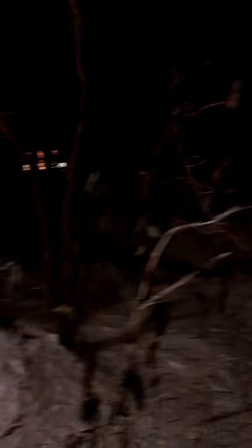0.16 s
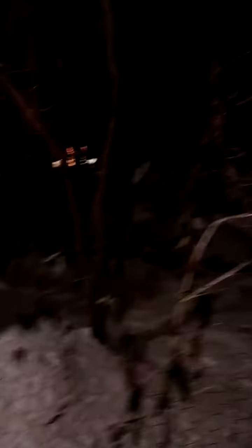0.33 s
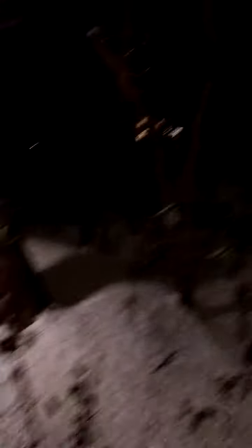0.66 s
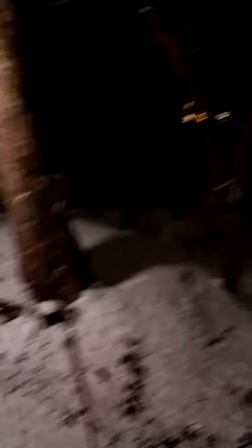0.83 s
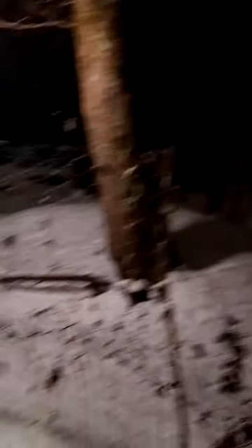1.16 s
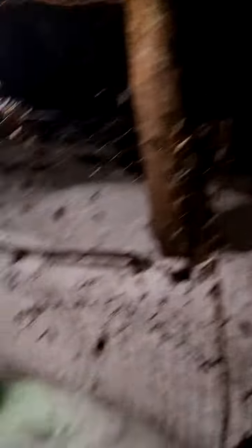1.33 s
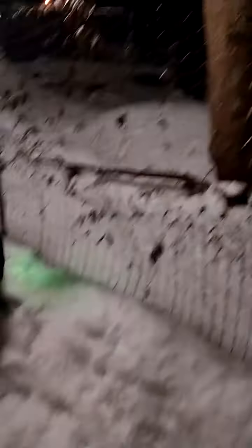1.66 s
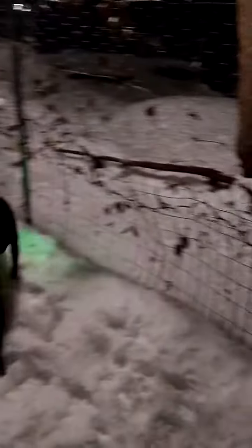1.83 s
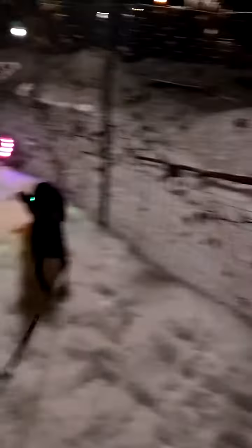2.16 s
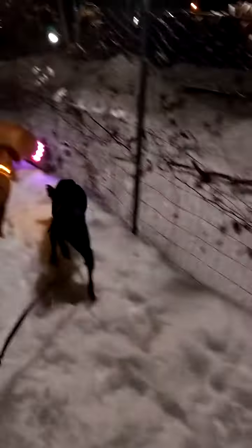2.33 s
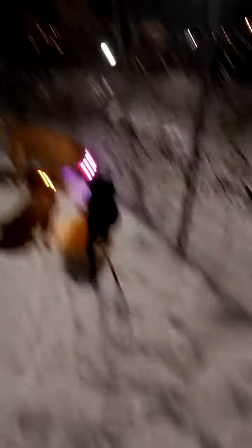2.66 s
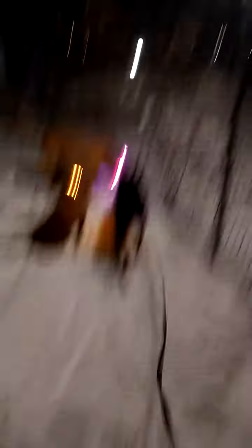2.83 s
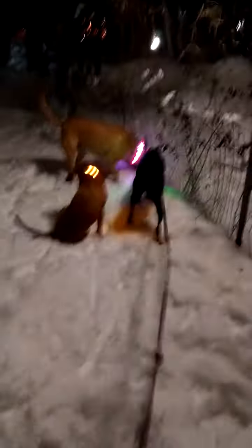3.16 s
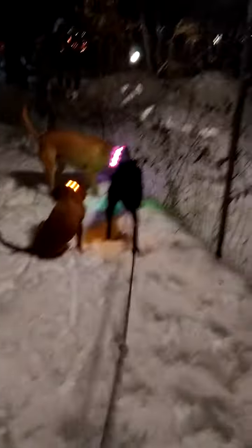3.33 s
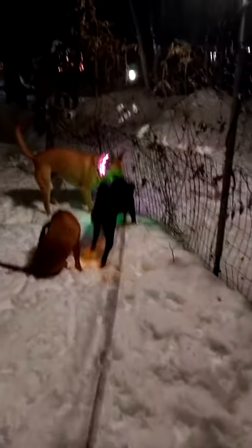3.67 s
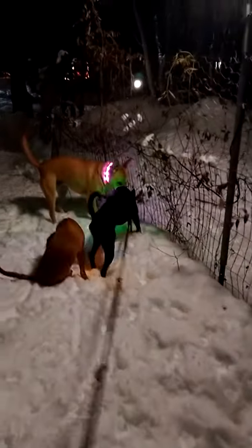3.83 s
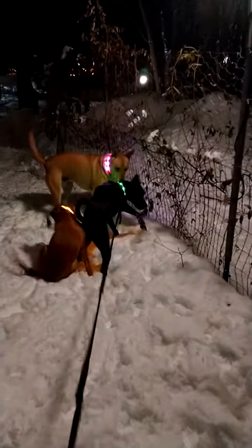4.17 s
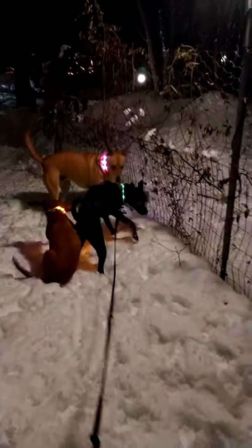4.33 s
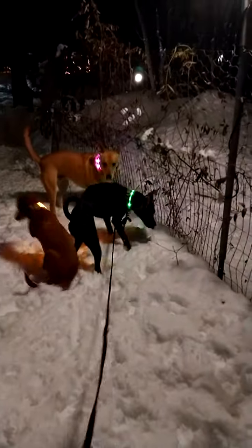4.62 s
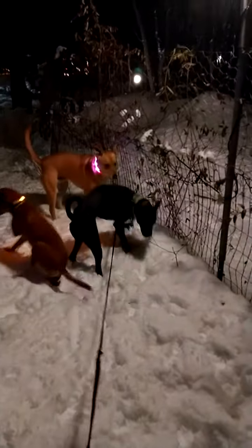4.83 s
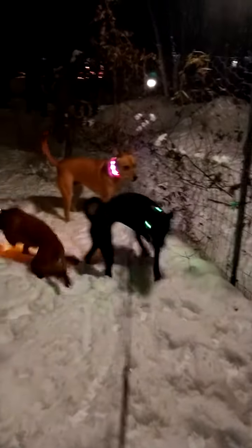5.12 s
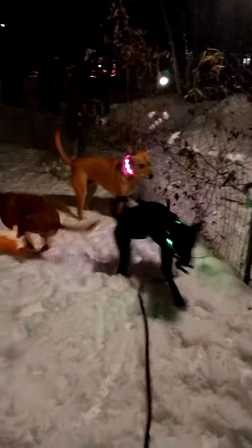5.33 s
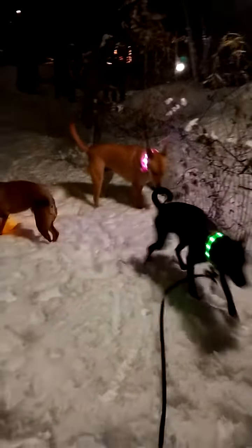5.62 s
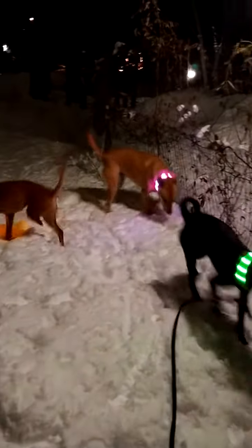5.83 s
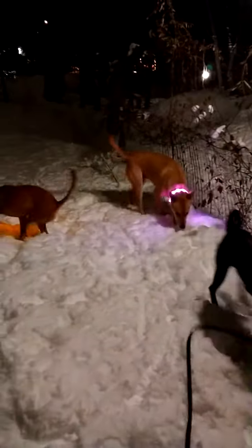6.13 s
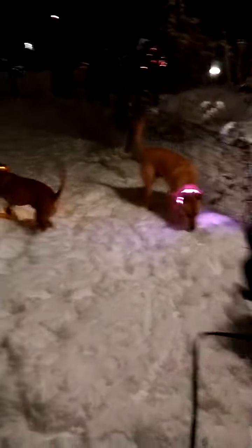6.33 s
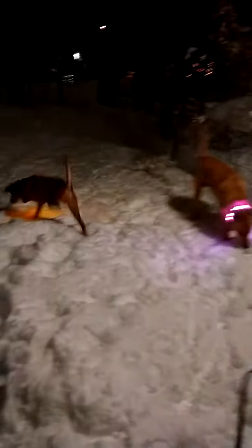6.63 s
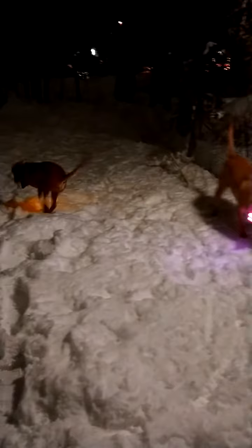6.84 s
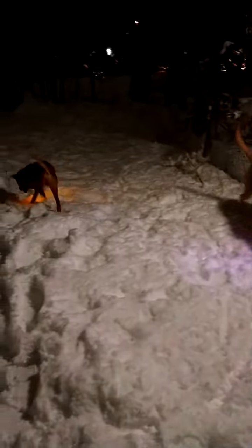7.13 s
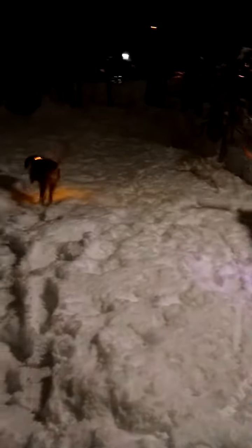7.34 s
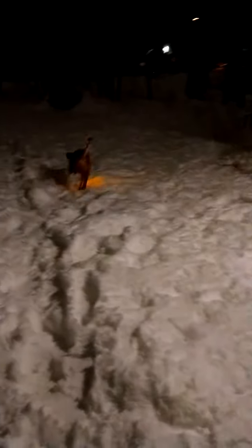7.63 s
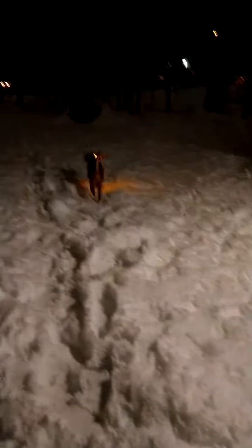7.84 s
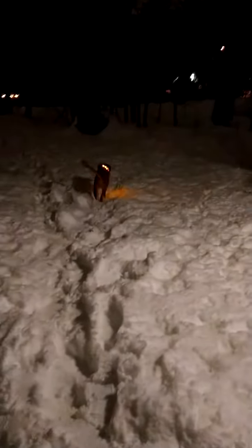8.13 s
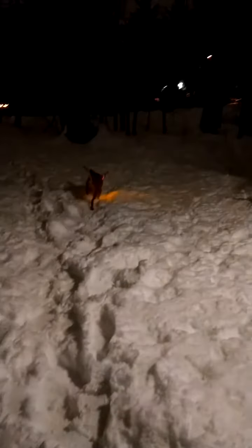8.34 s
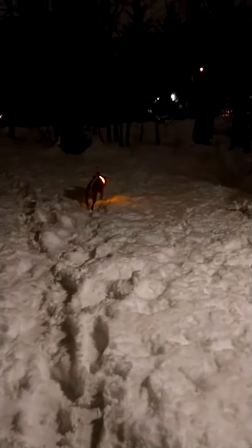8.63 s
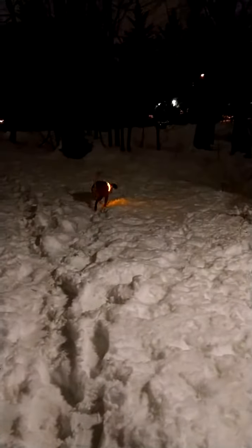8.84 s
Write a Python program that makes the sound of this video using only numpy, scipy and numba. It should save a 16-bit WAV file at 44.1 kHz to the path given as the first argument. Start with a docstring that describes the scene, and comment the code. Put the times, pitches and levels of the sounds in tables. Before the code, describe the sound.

Dog collar tags jingle in short bright bursts over close cloth and lead rustle, a brief snow crunch, and a faint low outdoor hum.

```python
"""Snowy yard at night: dogs mill about beside a walker who holds a phone and a lead.
A low town hum (shaped noise, two narrow notes) lies under all. Cloth and lead rustle close to the
right microphone (stick-slip grains). Metal collar tags clink (struck, damped modes), a nose whistles
(wavering sines), fibres or ice snap (noise bursts) and a boot crunches through the crust (coarse
grains, grit, decaying knocks)."""
import sys
import numpy as np
from scipy import signal
from scipy.fft import rfft, irfft, next_fast_len
from scipy.io import wavfile
from scipy.ndimage import uniform_filter1d
from numba import njit

SR = 44100
rng = np.random.default_rng(int(sys.argv[2]) if len(sys.argv) > 2 else 0)


def to_wav(s):
    """Save 16-bit WAV."""
    ch = np.atleast_2d(s).T  # columns
    pcm = np.round(np.clip(ch, -1, 1) * 32767)  # PCM
    wavfile.write(sys.argv[1], SR, pcm.astype(np.int16))


N = 396452

# town spectrum: (frequency [Hz], relative density [dB per Hz])
TOWN_SPECTRUM = [(20, -13), (60, -8), (170, 0.5), (293, -1), (388, -6.5), (923, -12), (2460, -28.5),
                 (5230, -44.5), (12400, -27), (15500, -31)]
# town level: (time [s], level [dB])
TOWN_LEVEL = [(0, -67.2), (3, -67.5), (4, -68.6), (9, -69.5)]
# town left-right likeness: (frequency [Hz], correlation [-1 to 1])
TOWN_LIKENESS = [(60, 0.89), (300, 0.95), (700, 0.6), (1500, 0.11)]
# town balance: (frequency [Hz], left minus right [dB])
TOWN_PAN = [(1500, 0.7), (4400, -1), (8000, -4)]
# hum notes: (frequency [Hz], width [Hz], level [dB])
HUM = [(248, 5, -77), (297, 9, -79)]

# cloth spectrum: (frequency [Hz], relative density [dB per Hz])
CLOTH_SPECTRUM = [(1200, -33.5), (2500, -24), (5330, -17), (8160, -0.5), (9560, -4), (12900, -29),
                  (14900, -2.5), (16000, -20.5)]
# cloth swishes: (peak time [s], peak level [dB], rise [s per 10 dB], fall [s per 10 dB])
SWISHES = [(0.207, -54, 0.011, 0.015), (0.327, -48, 0.071, 0.057), (0.653, -58.5, 0.079, 0.02),
           (0.73, -44.2, 0.025, 0.062), (1.15, -50, 0.11, 0.06), (1.201, -38.5, 0.03, 0.03),
           (1.508, -47.1, 0.073, 0.061), (1.733, -52.3, 0.03, 0.185), (2.198, -48.2, 0.129, 0.088),
           (2.351, -41.3, 0.062, 0.048), (2.436, -41.7, 0.032, 0.094), (2.637, -41.7, 0.061, 0.029),
           (2.676, -42.2, 0.008, 0.029), (2.891, -50.1, 0.165, 0.101), (3.322, -47.2, 0.141, 0.081),
           (4.083, -60.3, 0.008, 0.027), (4.313, -63.4, 0.031, 0.027), (4.624, -59.3, 0.067, 0.012),
           (5.073, -63.2, 0.094, 0.018), (5.462, -57, 0.03, 0.06), (5.663, -56, 0.032, 0.031),
           (5.881, -56.0, 0.062, 0.039), (6.355, -65.8, 0.359, 0.049), (6.55, -51.5, 0.089, 0.084),
           (7.1, -58.6, 0.012, 0.034), (7.154, -60.4, 0.013, 0.17), (7.649, -65.0, 0.01, 0.043),
           (8.284, -72.5, 0.017, 0.078), (8.499, -68.2, 0.061, 0.043), (8.716, -74.1, 0.008, 0.194)]
# faint rustle between swishes: (time [s], level [dB])
RUSTLE_BED = [(0, -57), (.45, -78), (1.0, -64), (1.65, -66.5), (2.0, -72), (3.5, -67), (3.87, -70),
              (3.96, -80), (4.05, -80), (4.4, -70.5), (5.3, -71), (6.2, -78), (7.0, -69), (7.75, -80),
              (7.93, -76), (8.1, -86)]
# balance of the fine rustle: (time [s], left minus right [dB])
RUSTLE_PAN = [(0, -19), (3.5, -16), (9, -13)]

# blows on the first tag:
# (time [s], strength [dB], hardness [dB per octave], spot struck [-1 to 1])
FIRST_HITS = [(0.004, -47.9, -0.2, -0.36), (0.039, -50.5, -3.3, -0.22), (0.811, -40.6, 18.1, 0.69),
              (0.933, -56, -8, 0), (1.744, -44.1, 12.8, 0.25), (1.785, -46.1, 9.9, -0.03),
              (1.8056, -34, 9.9, -0.04), (1.843, -38.9, 6.6, 0.06), (2.0426, -38, 10, 0.35),
              (2.125, -57, -10, 0), (2.234, -52.8, -19.5, -0.2), (2.3695, -44.5, 0.7, 0.05),
              (2.418, -34.8, 0.8, -0.13), (2.4327, -29.2, 7.7, 0.22), (2.459, -27.8, -2.6, 0.23),
              (2.484, -35.1, -3.8, 0.37), (2.51, -44.7, -0.7, -1.0), (3.218, -42, 8.9, 0.11),
              (3.249, -35.6, 6.9, 0.46), (3.2645, -24.7, 3.3, -0.0), (3.298, -35.3, -0.9, 0.37),
              (3.31, -35.7, -2.2, 0.22), (3.323, -35.5, 0.4, -0.3), (3.3574, -44.7, -15.7, -0.02),
              (3.377, -43.1, 0.8, 0.09), (4.721, -42.2, -6.4, 0.12), (4.966, -44.0, -3.4, -0.17),
              (5.22, -47.7, -2.2, 0.21), (5.257, -48.3, -0.2, 0.15), (5.303, -48.7, -3.7, -0.27),
              (5.329, -50, -15, 0.5), (5.366, -54, -5, 0.9), (5.45, -45.5, -1.8, -0.67),
              (5.709, -48.4, -2.4, -0.15), (5.762, -47, -8.4, -0.25), (5.848, -40.0, -4.0, -0.27),
              (5.8714, -27.5, 2.5, -0.43), (5.89, -33.9, -1.9, -0.57), (6.13, -61, -14, -0.2),
              (6.4905, -43.7, 3.1, 0.32), (6.5056, -34.9, -5.2, -0.22), (6.5184, -31.4, -3.0, -0.11),
              (6.5335, -34.4, 0.3, -0.28), (7.155, -60, -12, 0), (7.34, -59, -12, 0.2),
              (7.436, -43.5, -1.6, 0.5), (7.55, -64, 0, 0.9), (7.716, -64, -3, 0.9)]
# first tag's drift: (time [s], pitch shift [%], mean phase at the left microphone [rad])
FIRST_TURN = [(1.8, .1, -1.5), (2.04, .4, -1.6), (2.43, -.4, .6), (3.26, -.15, 2.4), (4.72, .3, 1.0),
              (5.87, .35, -1.3), (6.5, .5, -2.3)]
# first tag's modes: (frequency [Hz])
FIRST_HZ = [10435, 4180, 5888, 3370]
# per mode: (t60 [s], left minus right [dB], relative level [dB], gain per unit of spot [dB])
FIRST_MODES = [(0.072, -11.5, -1, -8), (0.096, -1, -2.5, 5.5), (0.12, -10.5, -9.5, 14),
               (0.026, -5, -9.5, -12)]
# modes tied to another: (leading mode [index], frequency [Hz], t60 [s], relative level [dB])
FIRST_MATES = [(0, 11210, .08, -13), (0, 10390, .06, -9)]
# blows on the second tag:
# (time [s], strength [dB], hardness [dB per octave], spot struck [-1 to 1])
SECOND_HITS = [(0.47, -49, 4, -0.26), (1.0936, -50.1, -2.7, -0.23), (1.2994, -50.7, -8.8, -0.59),
               (1.351, -49.8, -4.1, -0.16), (1.564, -49, 8, -0.6), (1.724, -45.9, -6.0, -0.26),
               (1.8992, -37.3, -0.7, 0.06), (2.424, -40.5, 5.3, -0.16), (2.616, -44.1, 8.2, -0.17),
               (2.937, -42.4, -6.0, -0.06), (3.1765, -38.4, -1.7, -0.34), (3.505, -59, -6, -0.2),
               (3.556, -57, -3, 0), (4.563, -47.5, -11.2, -0.54), (4.5935, -49.7, 4.8, 0.2),
               (5.34, -52, -8, 0.2), (5.656, -44.4, -0.2, 0.52), (6.388, -53.6, 5.3, 1.0),
               (6.5434, -26, 5.8, 0.62), (6.5624, -30, 4.4, 0.67), (6.595, -38, 7.4, 0.25),
               (7.089, -62, -4, 0.3)]
# second tag's modes: (frequency [Hz])
SECOND_HZ = [9326, 8190, 5819, 6247, 14130, 3395]
# per mode: (t60 [s], left minus right [dB], relative level [dB], gain per unit of spot [dB])
SECOND_MODES = [(.17, -26, -2.5, .7), (.14, -14, -4.5, -21), (.15, -5, -9.5, 9), (.25, -9, -13.5, -7),
                (.1, -16, -14, 15), (.22, -7, -16, 7.5)]
# modes tied to another: (leading mode [index], frequency [Hz], t60 [s], relative level [dB])
SECOND_MATES = [(5, 2961, .25, -7)]
# blows on the tag of a dog further off: (time [s], strength [dB], hardness [dB per octave])
FAR_HITS = [(5.655, -53, 1), (7.156, -65.5, 13), (7.586, -52, -4.5), (7.696, -63, -2.5), (7.929, -65, -3),
            (8.0224, -57, 3)]
# far tag's modes: (frequency [Hz])
FAR_HZ = [15200, 7650]
# per mode: (t60 [s], left minus right [dB])
FAR_MODES = [(.15, -14), (0.198, -9)]
# modes tied to another: (leading mode [index], frequency [Hz], t60 [s], relative level [dB])
FAR_MATES = [(1, 10550, .1, -9)]

# nose whistles, one list each: (time [s], pitch [Hz], level before panning [dB])
WHISTLES = [
    [(1.05, 6250, -57), (1.095, 6200, -60), (1.103, 6550, -58), (1.162, 6930, -43), (1.182, 7040, -68),
     (1.2, 7050, -40), (1.245, 6970, -49), (1.29, 6960, -68)],
    [(.43, 14900, -72), (.48, 15400, -72), (.6, 15400, -71), (.71, 15550, -69)],
    [(1.14, 8300, -60), (1.24, 8300, -47), (1.27, 8370, -65)],
]
# snaps: (time [s], crisp strength [dB], dull strength [dB])
SNAPS = [(0.692, -50, -56), (0.7507, -39, -51), (0.7826, -36, -47), (1.094, -36, -47), (1.1233, -39, -51),
         (1.303, -55, -43), (1.3653, -46, -58), (1.4062, -40, -44), (1.666, -60, -40), (2.6401, -30, -50),
         (2.676, -33, -52), (5.064, -54, -40), (6.425, -44, -50), (7.573, -60, -42), (7.799, -66, -46),
         (8.021, -60, -48), (8.281, -56, -52), (8.408, -66, -45), (8.5829, -66, -46), (8.7214, -56, -55)]
# crust giving way: (start [s], hold [s], coarse level [dB], grit level [dB])
CRUNCHES = [(1.19, .11, -67, -86), (2.3, .15, -65, -77), (2.465, .015, -59, -61), (2.591, .003, -58, -59),
            (2.74, .15, -54, -64.5), (2.92, .04, -69, -72), (4.398, .08, -72, -80)]
# crust spectrum: (frequency [Hz], relative density [dB per Hz])
CRUST_SPECTRUM = [(25, -27), (64, 0), (130, 1), (300, -9.5), (600, -11.5), (1400, -24)]
# knocks of lumps and twigs: (time [s], starting level [dB], pitch [Hz], t60 [s])
THUDS = [(1.666, -45.5, 2280, 0.0054), (2.501, -44, 587, 0.012), (2.59, -37, 363, 0.0096),
         (4.396, -54, 96.5, 0.13), (8.77, -52.5, 3280, 0.017), (8.781, -54, 3300, 0.016)]

PIVOT_HZ = 6000  # hardness tilts the modes about this
CONTACT_S, LEFT_PHASE_RAD = .001, 1.8
CHOKE, SECOND_CHOKE, BOUNCE_CHOKE = .6, .8, .73  # share of a ring left after a touch
BOUNCE_DB, SWING_S = -7, .02  # light bounces while a struck tag still swings
SETTLE_DB, SETTLE_S = -63, .15  # faint touches before and after blows, while the dog moves
FREE_S, FUR_T60_S = .035, .075  # tag falls back on the fur after FREE_S
CLINK_DB, TICK_DB, TICK_S = -4.5, -1, .0012  # broad clink; its bright edge
CRUNCH_RISE_S, CRUNCH_FALL_S = .012, .016  # per 10 dB
BOOT_LAG_S = .0005  # crunch is later at the left microphone
TOP_HZ = 15850


def undb(db):
    """dB to amplitude ratio."""
    return 10 ** (np.asarray(db) / 20)


def curve(rows):
    """Columns of a table joined by straight lines in time."""
    time_s, *columns = np.transpose(rows)
    return [np.interp(np.arange(N) / SR, time_s, column) for column in columns]


def over_hz(points, size):
    """A (Hz, value) table on the bins of a transform, interpolated in log frequency."""
    hz, value = np.transpose(points)
    bin_hz = np.maximum(np.arange(size // 2 + 1) * SR / size, 1)
    return np.interp(np.log(bin_hz), np.log(hz), value)


def colour(x, points):
    """Causal filter with the given spectrum, from the folded cepstrum."""
    size = 8192
    cepstrum = irfft(np.log(undb(over_hz(points, size))), size)
    cepstrum[1:size // 2] *= 2
    cepstrum[size // 2 + 1:] = 0
    response = irfft(np.exp(rfft(cepstrum)), size)[:size // 2]
    return signal.oaconvolve(np.atleast_2d(x), response[None], axes=1)[:, :N].squeeze()


def band(x, lo_hz, hi_hz):
    """Butterworth band-pass."""
    return signal.sosfilt(signal.butter(3, [lo_hz, hi_hz], "band", fs=SR, output="sos"), x)


def unit(x, lo_hz, hi_hz):
    """Scales a steady sound to rms 1 within a band, judged on its first two seconds."""
    return x / np.std(band(x[:2 * SR], lo_hz, hi_hz))


def walk(count):
    """Random levels, count of them a second, smoothed by two running means; spread about 0.6."""
    step = SR // count
    levels = np.repeat(rng.standard_normal(N // step + 1), step)
    return 0.81 * uniform_filter1d(uniform_filter1d(levels, step), step)[:N]


def grains(count, spread_db):
    """Random slips, count of them a second, many small and a few large."""
    place, sign, rarity = rng.random((count * N // SR, 3)).T
    size_db = np.minimum(-spread_db * np.log(rarity + 1e-9), 5 * spread_db)
    return np.bincount((place * N).astype(int), np.sign(sign - .5) * undb(size_db), N)


def decay(impulses, time_s):
    """Each impulse dies away exponentially with this time constant."""
    return signal.lfilter([1], [1, -np.exp(-1 / (time_s * SR))], impulses)


def tent_db(start, end, db, rise, fall):
    """Level of overlapping events that rise, hold from start to end and fall, in s per 10 dB."""
    t, power = np.arange(0, N, 32) / SR, 1e-14
    for a, b, top, up, down in np.broadcast(start, end, db, rise, fall):
        drop = np.maximum(np.maximum((a - t) / up, (t - b) / down), 0)
        power = power + undb(2 * (top - 10 * drop))
    return np.interp(np.arange(N) / SR, t, 10 * np.log10(power))


def town():
    """Distant traffic and plant: bass alike in both microphones, treble unrelated, two hum notes."""
    size = next_fast_len(N)
    like = np.clip(over_hz(TOWN_LIKENESS, size), -.99, .99)
    mid, side = rfft(colour(rng.standard_normal((2, N)), TOWN_SPECTRUM), size)
    wide = side * np.sqrt((1 - like) / (1 + like))
    tilt = undb(over_hz(TOWN_PAN, size) / 2)
    air = irfft([(mid + wide) * tilt, (mid - wide) / tilt], size)[:, :N]
    level_db = curve(TOWN_LEVEL)[0] + 1.2 * walk(count=2)
    air *= undb(level_db) / np.std(band(air.mean(axis=0), 45, 2500))
    for hz, width_hz, db in HUM:
        note = band(rng.standard_normal(N), hz - width_hz / 2, hz + width_hz / 2)
        air += undb(db) * note / note.std()
    return air


def rustle():
    """Dense stick-slip grains of cloth and lead; the right microphone is the near one."""
    peak_s, db, rise, fall = np.transpose(SWISHES)
    swish_power = undb(2 * tent_db(peak_s, peak_s, db, rise, fall))
    level_db = 10 * np.log10(swish_power + undb(2 * curve(RUSTLE_BED)[0]))
    shared = grains(count=3000, spread_db=3.5)
    grip = undb(3.5 * walk(count=90))
    patchy = undb(3 * walk(count=30))
    out = []
    for fine_db, body_db in ((curve(RUSTLE_PAN)[0], -3), (0, 0)):  # left, right
        slips = (grains(count=8000, spread_db=3.5) + 0.51 * shared) * grip
        slips = colour(slips, CLOTH_SPECTRUM)
        fine = unit(band(slips, 5150, 13900), 7180, 8056)
        body = unit(band(slips, 1200, 5150) * patchy, 4830, 5910)
        # harder rubbing brightens the cloth: its body grows more slowly
        body *= undb(body_db - 76.5 + 0.41 * (level_db + 66.5))
        out.append(undb(level_db + fine_db) * fine + body)
    return np.array(out)


@njit
def ring(push, keep, pole, contact):
    """One mode: the blow enters over a short contact, and each touch damps what still rings."""
    y, z, a = np.empty(len(push), np.complex128), 0j, 0j
    for i in range(len(push)):
        a = a * pole * contact + (1 - contact) * push[i] + 1e-18
        z = z * pole * keep[i] + a
        y[i] = z
    return y


def mode(push, keep, hz, t60_s):
    """Rings one mode of given pitch and free decay."""
    pole = np.exp((2j * np.pi * hz - np.log(1000) / t60_s) / SR)
    return ring(push, keep, pole, np.exp(-1 / (CONTACT_S * SR)))


def damping(at, bounce, free_s, choke):
    """Share of the ring kept per sample: touches choke it, then the fur does."""
    loss = np.zeros(N)
    loss[at], loss[bounce] = np.log(np.clip([choke, BOUNCE_CHOKE], .01, 1))
    last = np.maximum.accumulate(np.bincount(at, at, N))
    on_fur = np.arange(N) - last > free_s * SR
    loss -= on_fur * np.log(1000) / (FUR_T60_S * SR)
    return np.exp(uniform_filter1d(loss, size=40))  # a touch takes about a millisecond


def clink(at, bounce, size, swing):
    """Every contact, bounces too, adds a short broad noise between the modes and a bright edge."""
    bounce_size = (swing * size).max(axis=1) * rng.random(len(bounce))
    blows = np.bincount(at, size, N) + np.bincount(bounce, bounce_size, N)
    edge = decay(blows, TICK_S) * rng.standard_normal(N)
    wash = decay(blows, .0035) * rng.standard_normal((2, N))
    out = band(edge, 2500, 12000) * undb([[TICK_DB - 8], [TICK_DB]])
    return out + band(wash, 2800, 4600) * undb([[-3], [0]])


def tag(hits, freqs, modes, mates, count, free_s, choke, shift_pct=0, phase=LEFT_PHASE_RAD):
    """Struck metal tag: hardness and spot set the mode balance; count chance bounces a second."""
    hits, modes, out = np.array(hits), np.array(modes), np.zeros((2, N))
    at = (hits[:, 0] * SR).astype(int)
    fed_db = hits[:, 1:2] + hits[:, 2:3] * np.log2(np.array(freqs) / PIVOT_HZ)
    if hits.shape[1] > 3:
        fed_db += modes[:, 2] + hits[:, 3:] * modes[:, 3]
    bounce = rng.integers(0, N, count * N // SR)
    keep = damping(at, bounce, free_s, choke)
    since_s = (bounce[:, None] - at) / SR  # from each blow to each bounce
    swing = (since_s > 0) * np.exp(-np.abs(since_s) / SWING_S)
    settle = undb(np.minimum(SETTLE_DB - hits[:, 1], -11))
    swing += settle * np.exp(-np.abs(since_s) / SETTLE_S)
    # the tag turns, so its phase at the far microphone wanders
    turn = np.exp(1j * (phase + .5 * walk(count=6)))
    shift_s = np.cumsum(np.zeros(N) + shift_pct / 100) / SR
    for k, (hz, t60_s, side_db) in enumerate(zip(freqs, modes[:, 0], modes[:, 1])):
        push = np.zeros(N, complex)
        push[at] = undb(fed_db[:, k])
        chance = rng.standard_normal((len(bounce), 2)).T
        bounce_size = (swing * push[at]).max(axis=1) * undb(BOUNCE_DB)
        push[bounce] += bounce_size * (chance[0] + 1j * chance[1])
        z = mode(push, keep, hz, t60_s)
        z *= np.exp(2j * np.pi * hz * shift_s)
        for lead, mate_hz, mate_t60_s, mate_db in mates:  # modes this one drags along
            if k == lead:
                z += undb(mate_db) * mode(push, keep, mate_hz, mate_t60_s)
        # hold the left-right mean level, unless the sides nearly cancel
        z *= 2 / np.maximum(np.abs(1 + undb(side_db) * turn), .9)
        out[0] += undb(side_db) * (turn * z).imag
        out[1] += z.imag
    return out + clink(at, bounce, undb(fed_db[:, 1] + CLINK_DB), swing)


def first_tag():
    """Chattering tag whose pitch and phase drift as it turns."""
    shift_pct, phase = curve(FIRST_TURN)
    return tag(FIRST_HITS, FIRST_HZ, FIRST_MODES, FIRST_MATES, count=110, free_s=FREE_S,
               choke=CHOKE, shift_pct=shift_pct, phase=phase)


def second_tag():
    """Tag with longer-ringing modes, sparser bounces and a later fall on the fur."""
    return tag(SECOND_HITS, SECOND_HZ, SECOND_MODES, SECOND_MATES, count=12, free_s=.16,
               choke=SECOND_CHOKE)


def whistles():
    """Thin wavering tones of air through a dog's nose."""
    out = np.zeros(N)
    for rows in WHISTLES:
        hz, db = curve(rows)
        first_s, last_s = rows[0][0], rows[-1][0]
        on = np.interp(np.arange(N) / SR, [first_s - .008, first_s, last_s, last_s + .008], [0, 1, 1, 0])
        level = undb(db + 4 * walk(count=60) + 3 * walk(count=300))
        cycles = np.cumsum(hz + 30 * walk(count=150)) / SR
        out += on * level * np.sin(2 * np.pi * cycles)
    return out * undb([[-6], [7]])


def snaps():
    """Single fibres or ice crystals letting go: decaying noise bursts, crisp and dull."""
    time_s, crisp_db, dull_db = np.transpose(SNAPS)
    at = (time_s * SR).astype(int)

    def burst(db):
        return decay(np.bincount(at, undb(db), N), .0015) * rng.standard_normal(N)

    hiss = unit(colour(rng.standard_normal(N), CLOTH_SPECTRUM), 2000, 15000)
    crisp = hiss * np.abs(burst(crisp_db - 7))
    dull = band(burst(dull_db - 9), 1250, 6000)
    return crisp * undb([[-6], [10.5]]) + dull


def boots():
    """Crust breaks in coarse dull grains with grit on top; lone lumps and twigs knock."""
    start, hold, coarse_db, grit_db = np.transpose(CRUNCHES)

    def shape(db):
        return undb(tent_db(start, start + hold, db, CRUNCH_RISE_S, CRUNCH_FALL_S))

    lower, upper = (unit(colour(grains(count=500, spread_db=1.5), CRUST_SPECTRUM), 51, 400)
                    for _ in range(2))
    coarse = band(lower, 25, 900) + 1.6 * band(upper, 400, 1500)
    grit = unit(band(grains(count=1200, spread_db=4.5), 1000, 3800), 1700, 2600)
    right = shape(coarse_db) * coarse + shape(grit_db) * grit
    left = np.roll(right, int(BOOT_LAG_S * SR)) * undb(-1)
    out = np.array([left, right])
    t = np.arange(SR // 10) / SR
    for time_s, db, hz, t60_s in THUDS:
        k = int(time_s * SR)
        out[:, k:k + len(t)] += undb(db) * np.sin(2 * np.pi * hz * t) * 1000 ** (-t / t60_s)
    return out


def far_tag():
    """Tag of a dog further off, always struck on the same spot."""
    return tag(FAR_HITS, FAR_HZ, FAR_MODES, FAR_MATES, count=30, free_s=.07, choke=CHOKE)


def scene():
    """Sum of all sources, left and right."""
    tags = first_tag() + second_tag() + far_tag()
    return town() + rustle() + tags + whistles() + snaps() + boots()


def record(dry):
    """The phone cuts the top: steep elliptic low-pass."""
    return signal.sosfilt(signal.ellip(10, .3, 80, TOP_HZ, fs=SR, output="sos"), dry)


dry = scene()
out = record(dry)
to_wav(out)
```